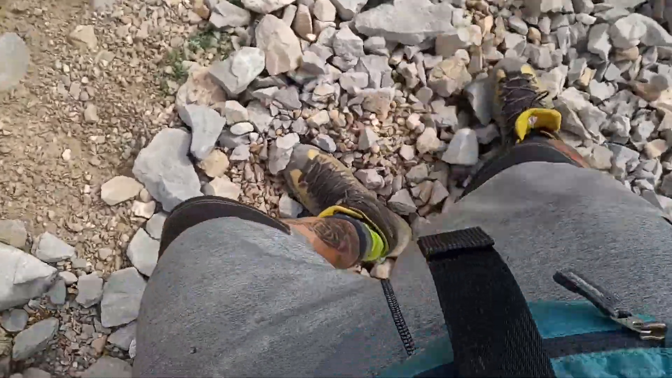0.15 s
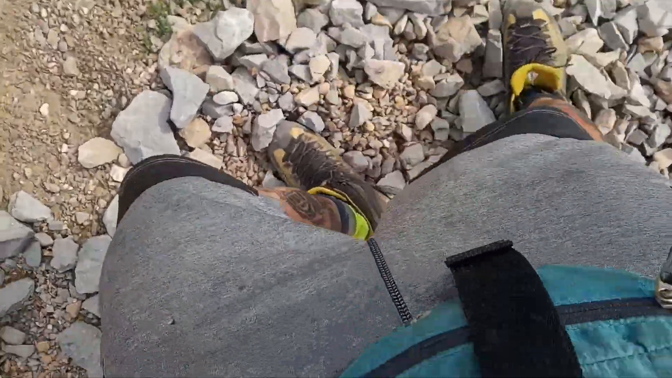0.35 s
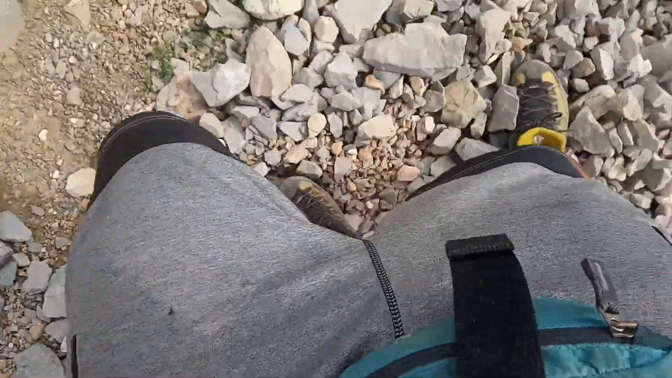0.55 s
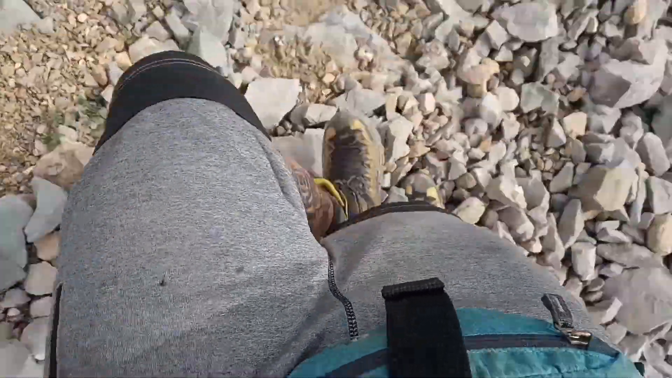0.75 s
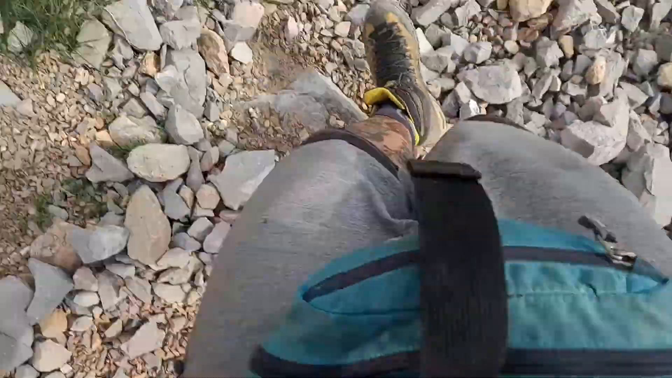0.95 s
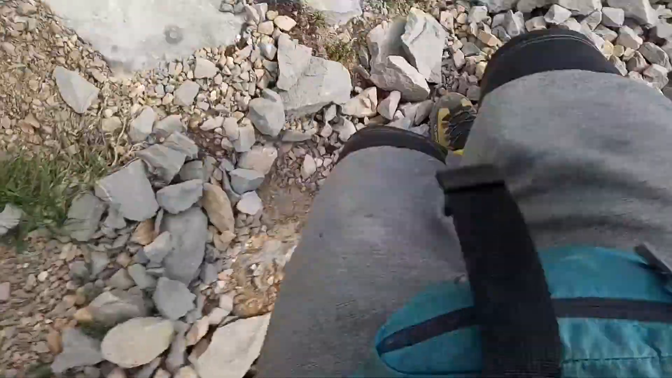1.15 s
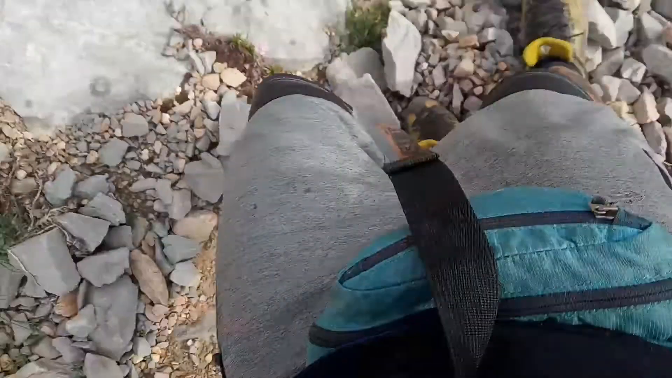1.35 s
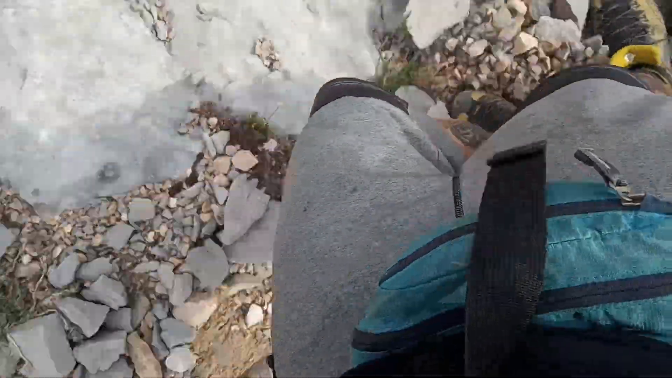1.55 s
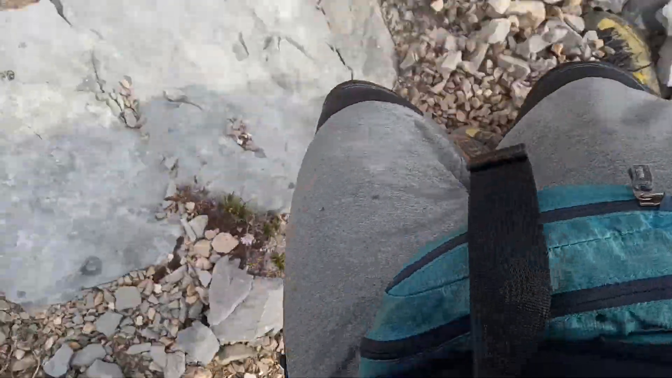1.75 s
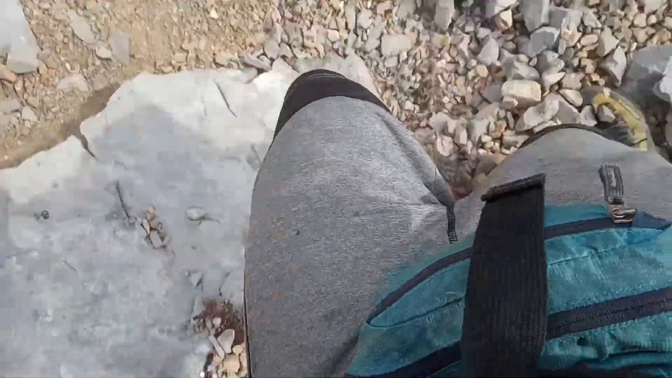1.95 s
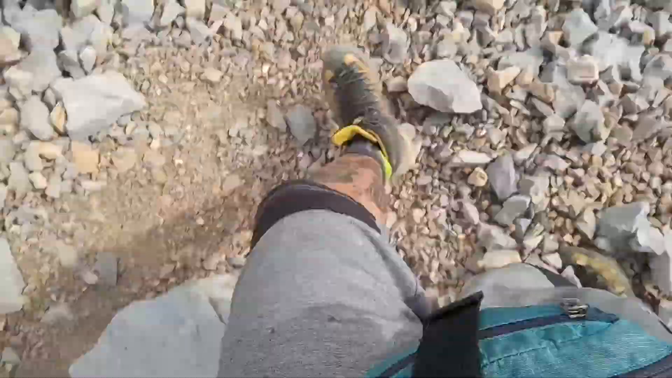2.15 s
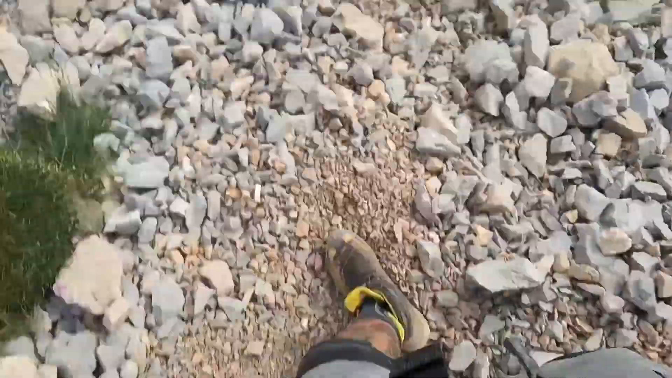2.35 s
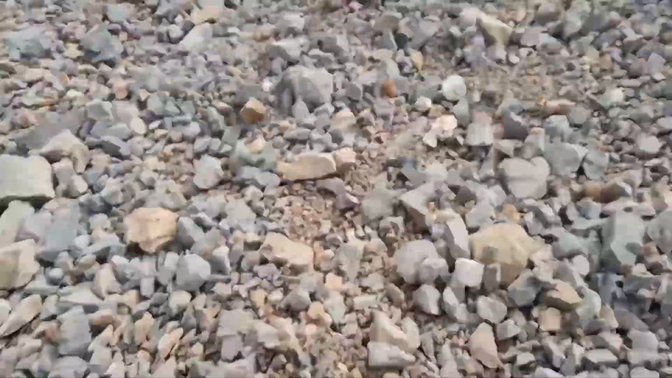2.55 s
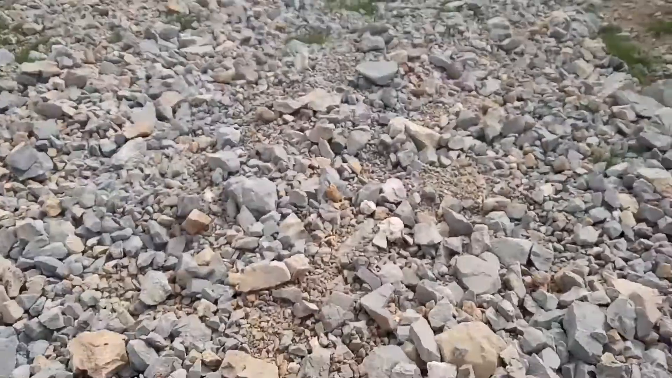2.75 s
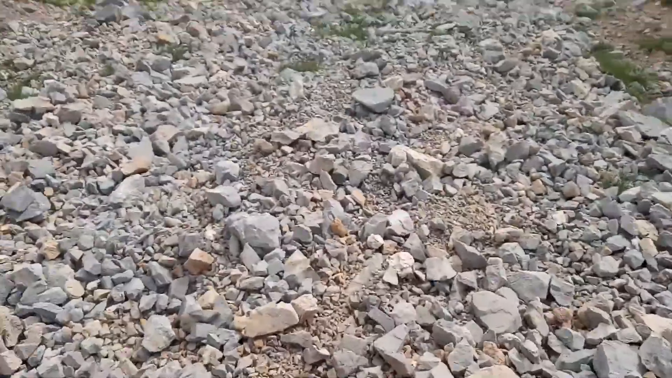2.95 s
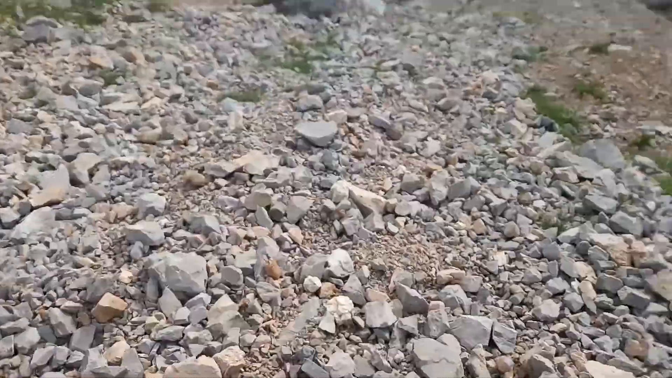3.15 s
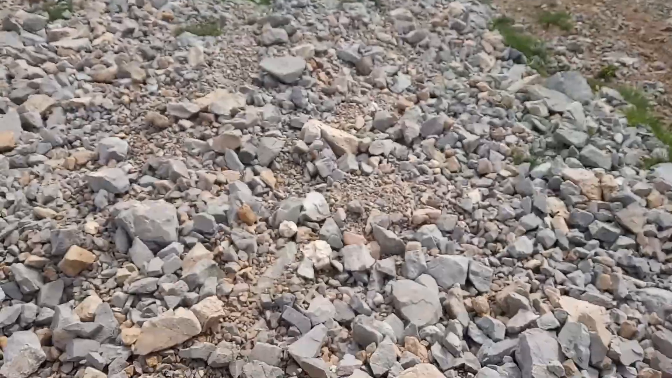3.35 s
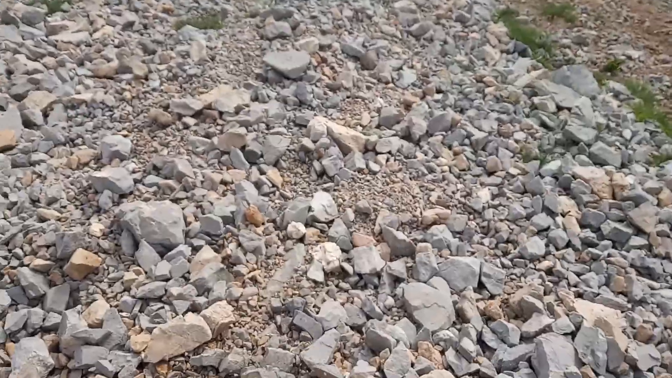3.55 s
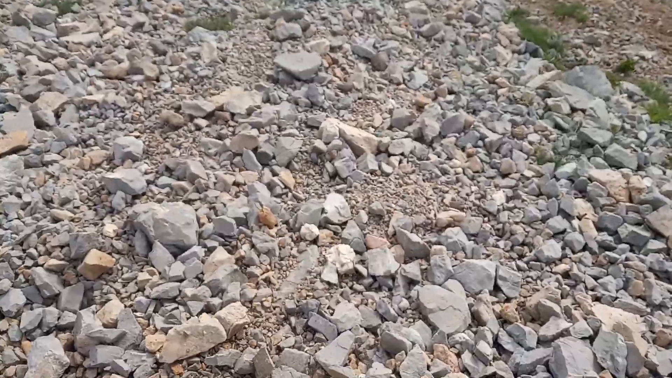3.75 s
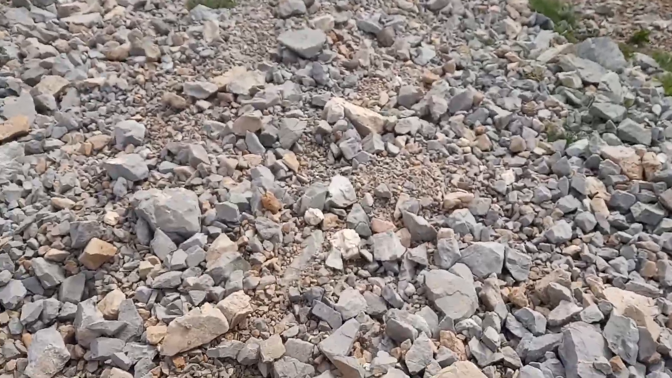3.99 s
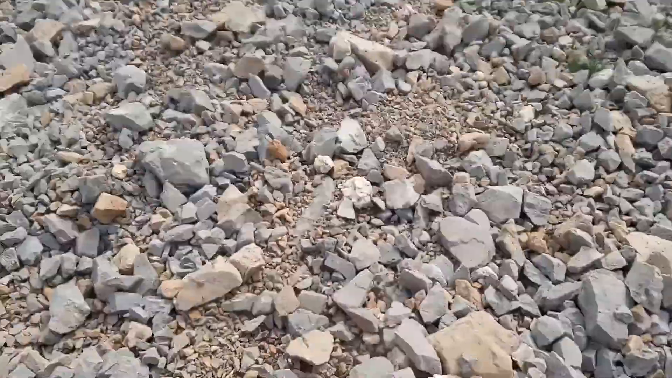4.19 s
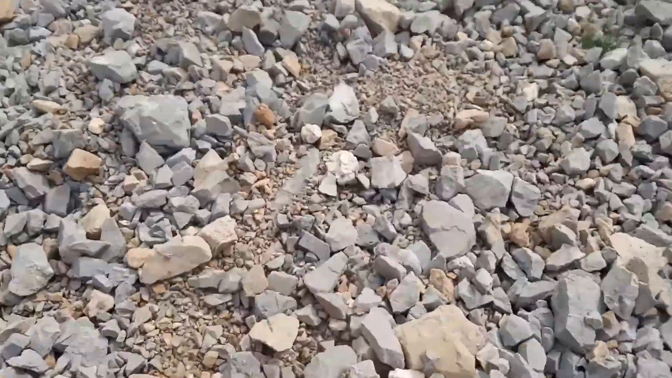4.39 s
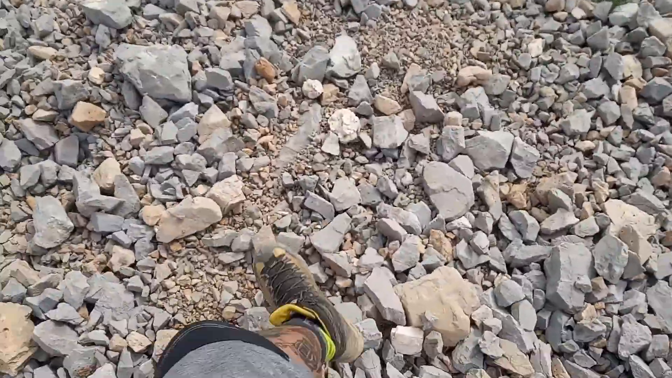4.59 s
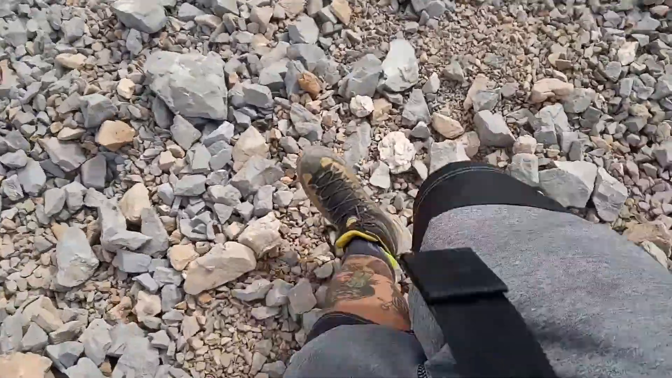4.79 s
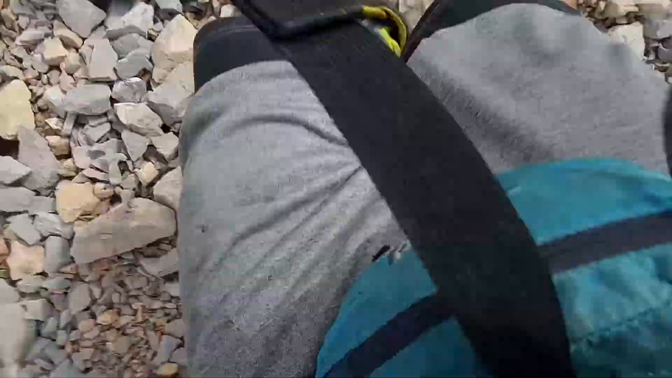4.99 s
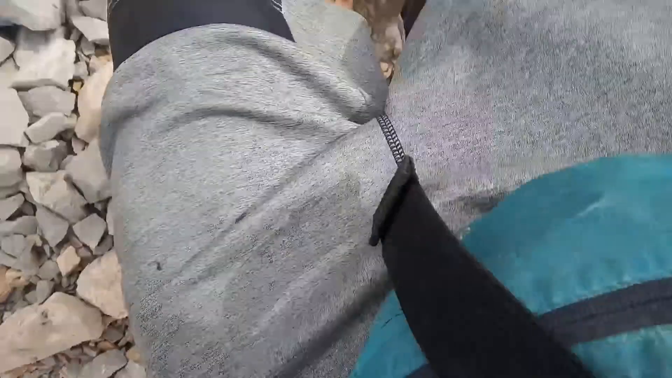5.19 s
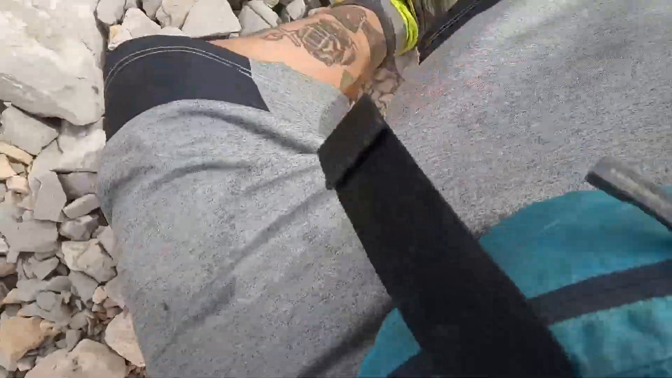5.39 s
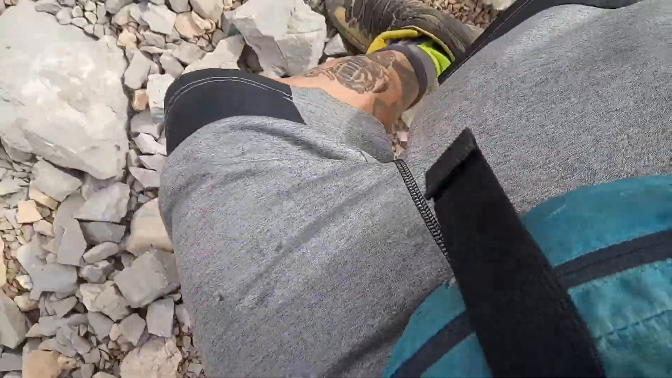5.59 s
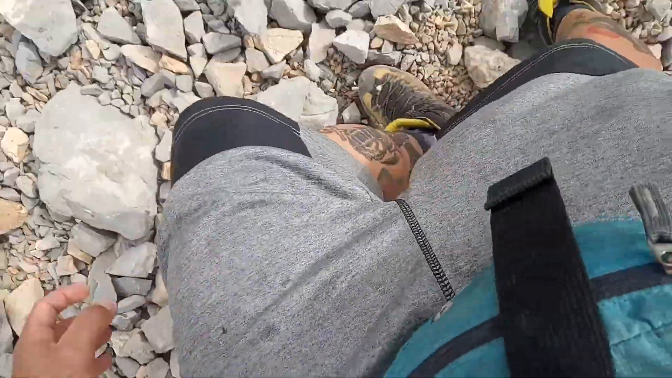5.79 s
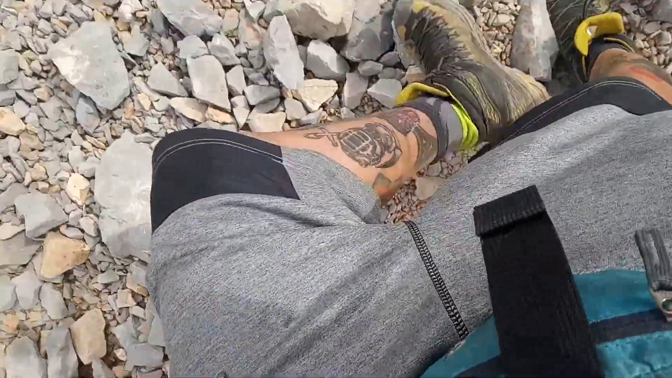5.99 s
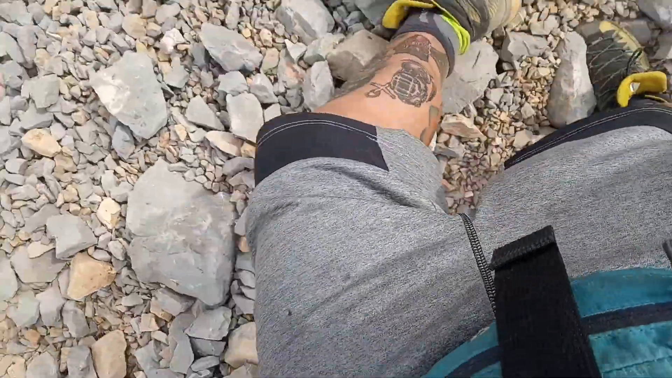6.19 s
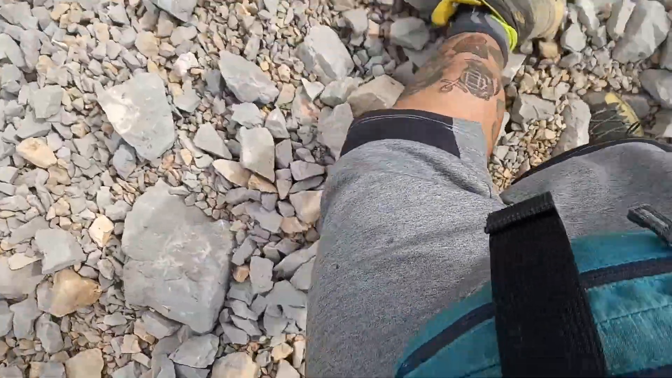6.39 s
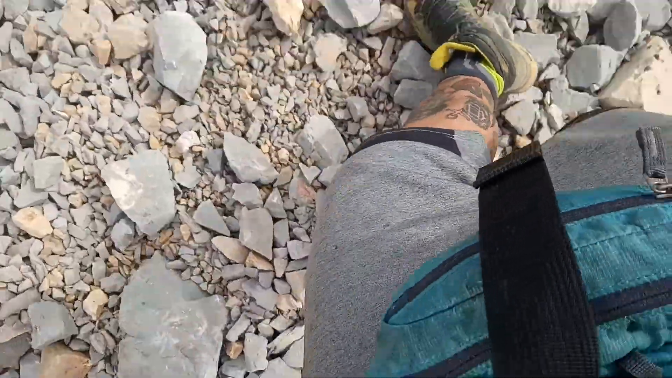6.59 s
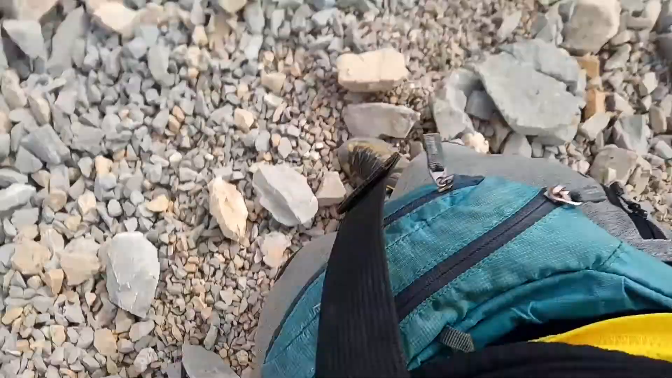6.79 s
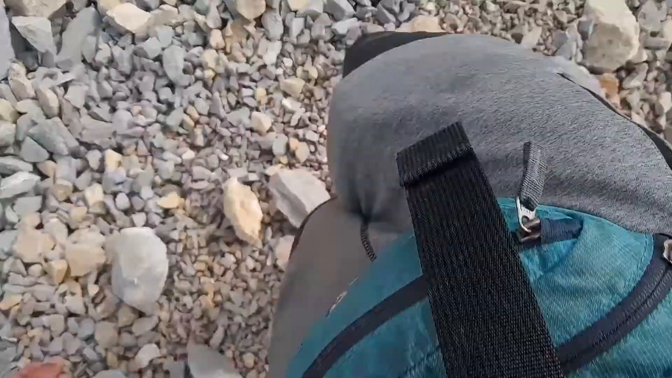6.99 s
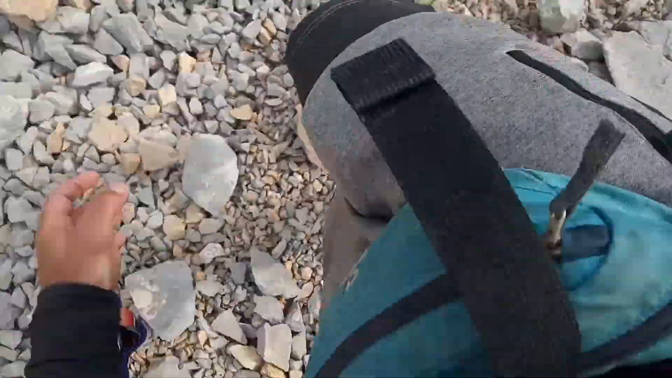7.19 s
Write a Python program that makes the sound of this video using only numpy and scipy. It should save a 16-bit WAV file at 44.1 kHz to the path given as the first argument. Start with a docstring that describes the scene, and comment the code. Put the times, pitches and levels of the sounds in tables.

```python
"""Boots on loose scree

Boots step and slide down loose stones, heard from a small camera at the waist.
Four sizes of stone scrape as filtered noise and trickle as thousands of short rings as the slope gives way.
Single stones clack out of the rush: a noisy snap plus a few dying sine tones each.
Low noise makes the thumps and air puffs on the microphone, uneven low pulses make one hard landing
judder, and steady filtered noise is the still mountain air."""
import sys
import numpy as np
from scipy import signal
from scipy.io import wavfile

SR = 44100
rng = np.random.default_rng(int(sys.argv[2]) if len(sys.argv) > 2 else 0)


def to_wav(sig):
    """Store sig (one row per channel, or 1-D mono) as 16-bit WAV at the path in sys.argv[1].

    Samples outside -1..1 are clipped; the rate is SR.
    """
    pcm = np.clip(np.atleast_2d(sig), -1, 1) * 32767
    pcm = np.round(pcm).astype(np.int16)
    wavfile.write(sys.argv[1], SR, pcm.T)  # frames by channels


N = 319177  # length in samples

# Tone of the still mountain air: (frequency [Hz], relative level [dB])
AIR_TONE = [(24, -65), (40, -41), (250, -30), (663, -9), (873, -6), (2000, -27), (6490, -33), (10700, -17),
            (16000, -18)]
AIR_DB = -73  # overall air level before the housing
# Tone of the low pressure on the microphone: (frequency [Hz], relative level [dB])
BUFFET_TONE = [(30, -19), (60, 1.5), (97, 4.5), (150, 3.5), (300, -6), (500, -34.5)]
# Puffs of air as the camera swings:
# (start [s], build-up [s], length [s], level [dB], fade over the length [dB])
PUFFS = [(0, .02, .3, -61, 3), (.42, 0.046, 0.14, -51.5, -3.5), (0.717, .05, .1, -53, -3),
         (0.876, 0.038, 0.17, -50, 0), (1.016, .06, 0.19, -35.5, 2.5), (1.78, .03, 0.21, -65.5, -2),
         (2.42, .05, .08, -48, 4), (3.224, .03, .35, -73, 3), (4.642, .03, 0.27, -48, -0.5),
         (5.17, .035, 0.063, -45, 6), (5.36, .05, 0.2, -56.5, 0), (6.4, .04, .1, -53, 3),
         (6.93, .03, 0.093, -55, 5), (7.173, .05, .1, -69, 0)]
STILL_DB = -86  # buffeting while nothing moves
# Low judder through the camera at a hard landing:
# (start [s], build-up [s], length [s], level [dB], fade over the length [dB])
JUDDER = (1.08, .02, .075, -31, 0)
JUDDER_HZ, JUDDER_SLOPE = 93.3, 1.2  # average pulse rate; how steeply its harmonics weaken

# A boot loads the heap and it gives way:
# (start [s], build-up [s], length [s], grit level [dB], fade over the length [dB],
#  cobbles against grit [dB], sand against grit [dB], thump at the microphone [dB])
SHOVES = [(.1, 0.27, 0.56, -38.5, 5, -2.5, -7, -53.5), (.815, 0.018, .07, -41.5, 7, 2, -6.5, -45),
          (.935, .02, 0.029, -49, 2, -12, -13, -54), (1.02, 0.042, 0.16, -38, 8.5, 3.5, -17, -44),
          (1.193, 0.029, 0.47, -33, 2.5, -4.5, -8, -43.5), (2.215, 0.07, 0.095, -40, 1, 1.5, -7, -59),
          (2.344, 0.027, 0.15, -39, 3.5, 2.5, -5.5, -61), (2.685, 0.015, 0.037, -38, 3, -10, -5, -57),
          (2.76, 0.027, 0.046, -36.5, 6, -11, 1, -53), (2.885, 0.032, 0.18, -40.5, 6, 0, -7.5, -57),
          (3.06, .08, 0.1, -36.5, 5, 4, -3, -54), (3.39, 0.023, 0.048, -37.5, 1, -6, -1, -80),
          (3.49, 0.056, 0.086, -38, 2, -7, -2, -82), (4.525, 0.023, 0.14, -46, 3, -4.5, -7, -81),
          (4.868, 0.017, 0.081, -32.5, 2, 6, -7, -47), (4.95, 0.016, .145, -30.5, 0, 0.5, -4, -43),
          (5.125, 0.035, 0.4, -32, 7, 0, -1, -53), (5.675, 0.034, .07, -51, 0.5, 2.5, -3, -85),
          (6.165, .015, 0.031, -43, 6, -5, -9, -79), (6.26, .09, 0.3, -37.5, 2.5, -3.5, -6, -58),
          (6.57, 0.089, 0.15, -34.5, -1, -2, -1, -50), (6.75, 0.032, 0.22, -37.5, 8, -4, -4.5, -51)]
START_DB, STOP_DB = -13, -19  # where an event builds from; how far it has sunk when it stops
LET_GO_S, LET_GO_SHARE = 0.028, 0.26  # stopping time [s], plus this share of the event's length
PEBBLE_DB, PEBBLE_SHARE = -1.5, 0.31  # pebbles against grit, plus this share of the cobbles' dB
HEAVY_FADE = 1.39  # cobbles fade this many times as far as grit
# Loosened stones running down the slope:
# (time [s], grit level [dB], pebbles against grit [dB], sand against grit [dB])
RUN = [(0, -39, -5, -8), (.6, -40, -1.5, -10.5), (.78, -46, -1, -11.5), (1.18, -45.5, 3.5, -8.5),
       (1.4, -40, -7, -1.5), (1.7, -36.5, -5, -5.5), (2.08, -31.5, -4.5, -9), (2.2, -36.5, -5.5, -1.5),
       (2.33, -43, -9, -3), (2.58, -38.5, -7, -1.5), (2.86, -44, 2, -4), (3.35, -38.5, -0.5, 0),
       (3.48, -42, -1.5, 1.5), (3.62, -42.5, -8.5, 0.5), (4.27, -52, -0.5, -2.5), (4.51, -54, -9, -4),
       (4.85, -54.5, -1, -7), (5.64, -43.5, -1, 0), (6.14, -52.5, 1.5, -4.5), (7.02, -48, -0.5, -4),
       (7.16, -42, -5, -2), (7.24, -45, -8, -7)]
RUN_COBBLE_DB = -9.5  # few cobbles run: their level against the pebbles
PRESS_SHOVE, PRESS_RUN = 0.83, .45  # share 0-1 of dense scraping; the rest trickles one by one
THINNING_PER_DB, THIN_FROM_DB = .01, -42  # quieter runs scrape less: share per dB, around this level

# Stone sizes, cobbles, pebbles, grit, sand:
# (lowest ring [Hz], highest ring [Hz], how far single blows stand apart [factor])
STONES = [(215, 1210, 0.43), (1165, 3800, 1.44), (4030, 7600, 1.26), (7720, 14400, 1.1)]
# Ring of a stone: (multiple of its pitch [factor], level [dB])
OVERTONES = [(1.0, 1.5), (1.55, -7.5), (2.3, -19.5), (3.3, -15.5)]
RING_S = 0.0063  # time for a 2 kHz ring to die by 60 dB; higher rings die sooner
TRICKLE_PER_S, BLOW_SPREAD_DB = 900., 4  # average collisions per second; spread of their force
# Single stones clacking: (time [s], peak level before echoes and housing [dB], ring [Hz])
CLACKS = [(0.0278, -14.5, 6300), (0.04, -15, 6000), (0.0728, -14, 6700), (0.1774, -20, 9500),
          (0.2113, -9.5, 6100), (0.254, -18, 2290), (0.283, -15.5, 5550), (0.424, -18, 6270),
          (0.6514, -25.5, 2030), (0.682, -19, 4640), (0.7057, -20.5, 6100), (0.76, -25, 950),
          (0.8297, -20.5, 600), (0.836, -18.5, 5600), (0.8567, -19, 2000), (0.9124, -22, 6420),
          (0.9501, -21, 5170), (1.0278, -19, 4960), (1.0561, -17, 3770), (1.2886, -10.5, 4020),
          (1.6095, -22, 1480), (1.61, -13, 810), (1.7028, -16, 2860), (1.764, -14, 6440),
          (1.8333, -9, 9350), (1.9098, -15, 9300), (2.0157, -27, 6500), (2.0965, -17, 6270),
          (2.157, -20, 5600), (2.212, -21, 7000), (2.297, -18, 6250), (2.371, -21, 5900), (2.425, -29, 606),
          (2.662, -25, 6560), (2.673, -18.5, 3260), (2.703, -23.5, 344), (2.709, -22, 6170),
          (2.725, -30, 330), (2.7457, -19, 7040), (2.779, -18.5, 5900), (2.8012, -17, 10100),
          (2.8129, -17, 7240), (2.825, -23, 6350), (2.8351, -19, 6200), (2.8615, -11, 3630),
          (2.8805, -15, 12900), (2.8911, -22, 9970), (2.9242, -20.5, 6670), (2.9824, -19, 12900),
          (3.0222, -15, 3530), (3.1822, -23, 1950), (3.2029, -24, 1930), (3.2217, -17, 12200),
          (3.3314, -16, 5900), (3.3367, -15.5, 7200), (3.3444, -11.5, 11300), (3.365, -28, 2550),
          (3.431, -18.5, 1810), (3.452, -21, 1940), (3.5334, -25, 2000), (3.547, -15.5, 3840),
          (3.57, -17, 1890), (3.587, -21, 6370), (3.5985, -18, 6680), (3.6247, -21, 9580),
          (3.651, -13.5, 7400), (3.6539, -19.5, 1780), (3.712, -23.5, 2400), (3.7841, -20, 5320),
          (3.7912, -23, 12810), (3.8453, -28, 1770), (3.894, -22, 3400), (3.93, -34, 566),
          (3.946, -18.5, 4830), (3.957, -31, 2280), (3.968, -24, 6610), (4.0004, -29, 9550),
          (4.087, -28, 6450), (4.0998, -20, 7900), (4.1296, -21, 3200), (4.135, -28.5, 1870),
          (4.2234, -35, 6400), (4.285, -19.5, 6970), (4.398, -22, 8850), (4.58, -30.5, 477),
          (4.639, -21, 6270), (4.7743, -30, 6000), (4.8233, -33, 2470), (5.1216, -10, 1910),
          (5.138, -12, 1490), (5.158, -13, 3530), (5.1762, -16, 4030), (5.2199, -17, 4770),
          (5.263, -15.5, 2020), (5.345, -18.5, 2040), (5.35, -15.5, 1240), (5.381, -21, 1700),
          (5.461, -19, 3800), (5.486, -22, 3540), (5.5231, -15, 1720), (5.5306, -18.5, 1940),
          (5.534, -17.5, 3620), (5.541, -18, 1780), (5.6028, -21, 3900), (5.609, -31, 6800),
          (5.683, -25, 5500), (5.6837, -24, 1450), (5.693, -20.5, 1800), (5.7015, -19.5, 1300),
          (5.7125, -26, 2730), (5.7294, -19.5, 2040), (5.777, -22, 7200), (5.7777, -15.5, 4100),
          (5.7906, -21.5, 6440), (5.8018, -24, 2380), (5.831, -15, 1730), (5.843, -31, 4300),
          (5.862, -35, 2100), (5.8729, -23, 2080), (5.8737, -21.5, 3900), (5.9255, -22, 1890),
          (5.93, -21.5, 5660), (6.0047, -29.5, 900), (6.011, -27, 6550), (6.043, -31, 5810),
          (6.0853, -17.5, 3060), (6.126, -14, 5160), (6.163, -22, 6650), (6.383, -22, 460),
          (6.775, -25, 535), (6.79, -15, 1210), (6.833, -21, 1300), (6.8327, -18, 607.6), (6.855, -25, 650),
          (6.8864, -21, 1970), (6.919, -27, 1500), (6.926, -22, 5100), (7.2, -26.5, 1470)]
SNAP_DB = -3.5  # contact snap of a single clack, before filtering

# Colour of the microphone in its housing: (frequency [Hz], level [dB])
HOUSING = [(100, -0.5), (800, 3), (1200, -3), (2050, 4), (3000, 0), (4800, -1), (6490, 4.5), (7930, -4),
           (9500, 4), (13000, -2), (16000, 3)]
EDGE_HZ = 15780  # upper band limit


def gain_of(db):
    """Turns decibels into a factor on the sound wave."""
    return 10 ** (np.asarray(db) / 20)


def evened(x):
    """Scales a sound to an average (rms) level of 1."""
    return x / np.sqrt(np.mean(x ** 2) + 1e-20)


def curve(rows):
    """Joins table rows by straight lines, one value per sample for each column after the time."""
    s, *columns = np.transpose(rows)
    return [np.interp(np.arange(N) / SR, s, column) for column in columns]


def coloured(x, points):
    """Filters to a given tone, with the response as early as possible (minimum phase)."""
    f, db = np.transpose(points)
    hz = abs(np.fft.fftfreq(8192, 1 / SR))
    log_gain = np.log(gain_of(np.interp(np.log(hz + 1), np.log(f + 1), db)))
    # the Hilbert transform of the log gain gives the matching phase
    spectrum = np.exp(np.conj(signal.hilbert(log_gain)))
    taps = np.fft.ifft(spectrum).real[:4096]
    return signal.oaconvolve(x, taps)[..., :N]


def wander(rate_hz):
    """Random drift of rms 1: noise with everything faster than rate_hz smoothed away."""
    low_pass = signal.butter(2, 2 * rate_hz / SR)
    return evened(signal.lfilter(*low_pass, rng.standard_normal(N)))


def swell(start, rise, length, db, fade_db):
    """Power of one event over time: it builds up, fades slowly, then lets go."""
    t = np.arange(N) / SR - start
    let_go = LET_GO_S + LET_GO_SHARE * length
    corners = np.cumsum([0, rise, max(length - rise, 1e-3), let_go])
    shape_db = np.interp(t, corners, [START_DB, 0, -fade_db, STOP_DB - fade_db])
    return gain_of(db + shape_db) ** 2 * (t > 0) * (t < length + let_go)


def still_air():
    """Still mountain air as steady, soft, filtered noise."""
    return gain_of(AIR_DB) * evened(coloured(rng.standard_normal(N), AIR_TONE))


def buffet():
    """Lumpy low pressure on the microphone: each shove jolts it, and air puffs as the camera swings."""
    rumble = coloured(rng.standard_normal(N), BUFFET_TONE)
    lumps = evened(rumble * gain_of(2.0 * wander(32)))
    power = gain_of(STILL_DB) ** 2
    for start, rise, length, _, fade_db, _, _, thump_db in SHOVES:
        power = power + swell(start, rise, length, thump_db, fade_db)
    for puff in PUFFS:
        power = power + swell(*puff)
    return np.sqrt(power) * lumps


def judder():
    """A hard landing shakes the camera: a short run of low pulses, uneven in rate and strength."""
    turns = np.cumsum(JUDDER_HZ * (1 + .08 * wander(28.7))) / SR
    pulses = sum(np.cos(2 * np.pi * k * turns) / k ** JUDDER_SLOPE for k in range(1, 6))
    return np.sqrt(swell(*JUDDER)) * evened(pulses) * gain_of(1.6 * wander(60))


def ground(x):
    """Outdoors only the rough ground nearby answers: a faint scatter of early echoes."""
    t = np.arange(2600) / SR
    hits = rng.standard_normal(len(t)) * (rng.random(len(t)) < .06)
    taps = hits * gain_of(-60 * t / 0.022) * (t > .001)
    echoes = signal.oaconvolve(x, taps / np.linalg.norm(taps))[:N]
    return x + gain_of(-16.0) * echoes


def clack(hz, snap_db, chance, rise_s=0.00009, snap_s=0.0042):
    """A snap of contact and a few quickly dying rings; random numbers give each stone its own shape."""
    t = np.arange(1200) / SR
    snap = gain_of(snap_db - 60 * t / snap_s) * chance[:len(t)]
    # big stones touch longer, so their snap is duller
    snap_edge = min(2 * (0.82 * hz + 2700.0) / SR, .95)
    out = signal.lfilter(*signal.butter(2, snap_edge), snap)
    for k, (multiple, db) in enumerate(OVERTONES):
        # the lowest ring is exact; the overtones vary in pitch and level
        f = hz * multiple * (1 + 0.17 * chance[-1 - k] * (k > 0))
        db = db + 3 * chance[-9 - k] * (k > 0)
        t60 = RING_S * (2000 / f) ** 0.44
        ring = gain_of(db - 60 * t / t60) * np.sin(2 * np.pi * f * t)
        out = out + ring * (f < .45 * SR) * (1 - np.exp(-t / rise_s))
    # a small stone radiates no bass
    out = signal.lfilter(*signal.butter(2, 2 * 0.24 * hz / SR, "high"), out)
    return out / abs(out).max()


def clacks():
    """Single stones striking near the boots, each a snap and ring at its own time."""
    out = np.zeros(N + SR)
    for (s, db, hz), chance in zip(CLACKS, rng.standard_normal((len(CLACKS), 1220))):
        sound = gain_of(db) * clack(hz, SNAP_DB, chance)
        out[round(s * SR):][:len(sound)] += sound
    return out[:N]


def trickle(count):
    """Random collisions of unequal force, each ringing one of many stones."""
    force = gain_of(BLOW_SPREAD_DB * np.minimum(rng.exponential(1, N), 3.3))
    blows = force * (rng.random(N) < TRICKLE_PER_S / SR)
    which = rng.integers(0, count, N)
    out = np.zeros(N)
    for k, hz in enumerate(np.geomspace(350, 13000, count)):
        ring = clack(hz, -2.0, rng.standard_normal(1220))
        out += signal.oaconvolve(blows * (which == k), ring / np.linalg.norm(ring))[:N]
    return out


def moving():
    """Power of each stone size over time, shoved by the boots and running loose."""
    shoved = np.zeros((4, N))
    for start, rise, length, db, fade_db, cobble_db, sand_db, _ in SHOVES:
        grit = swell(start, rise, length, db, fade_db)
        cobbles = swell(start, rise, length, db + cobble_db, HEAVY_FADE * fade_db)
        pebbles = grit * gain_of(PEBBLE_DB + PEBBLE_SHARE * cobble_db) ** 2
        sand = grit * gain_of(sand_db) ** 2
        shoved += [cobbles, pebbles, grit, sand]
    grit_db, pebble_db, sand_db = curve(RUN)
    against_grit = np.array([pebble_db + RUN_COBBLE_DB, pebble_db, 0 * grit_db, sand_db])
    return shoved, gain_of(grit_db + against_grit) ** 2


def slide():
    """Scraping and trickling stones; the heap slips and holds in surges shared by every size."""
    stones = trickle(count=40)
    grit_db = curve(RUN)[0]
    run_press = np.clip(PRESS_RUN + THINNING_PER_DB * (grit_db - THIN_FROM_DB), 0, 1)
    surges = gain_of(1.62 * wander(17) + 1.82 * wander(81) + 0.77 * wander(630))
    out = np.zeros(N)
    for (lo_hz, hi_hz, apart), shoved, running in zip(STONES, *moving()):
        band = signal.butter(3, [2 * lo_hz / SR, 2 * hi_hz / SR], "band", output="sos")
        power = shoved + running
        press = (PRESS_SHOVE * shoved + run_press * running) / power
        loose = np.clip(apart * (1 - press), 0, 1)
        scrape = signal.sosfilt(band, surges * rng.standard_normal(N))
        grinding = evened(scrape * gain_of(0.93 * wander(50.0)))  # each size also catches on its own
        trickling = evened(signal.sosfilt(band, stones))
        # square roots turn shares of power into factors on the wave
        out += np.sqrt(power) * (np.sqrt(1 - loose) * grinding + np.sqrt(loose) * trickling)
    return out


def scene():
    """Adds still air, buffeting, judder and scree; the scree loses its lowest bass."""
    stones = ground(slide() + clacks())
    scree = signal.lfilter(*signal.butter(3, 2 * 153.0 / SR, "high"), stones)
    return (still_air() + buffet() + judder() + scree)[None]


def record(dry):
    """The microphone's housing colours the sound, then a filter removes the highest treble."""
    heard = coloured(dry[0], HOUSING)[None]
    band_limit = signal.firwin(511, EDGE_HZ, window=("kaiser", 9), fs=SR)[None]
    return signal.oaconvolve(heard, band_limit, "same")


dry = scene()
out = record(dry)
to_wav(out)
```